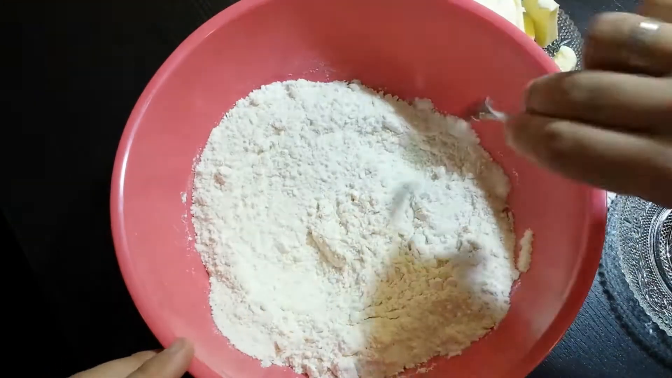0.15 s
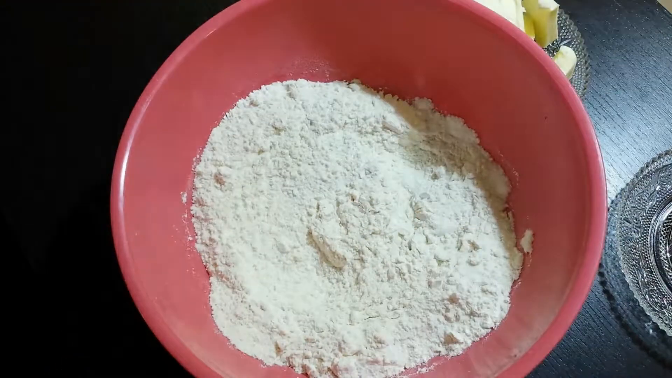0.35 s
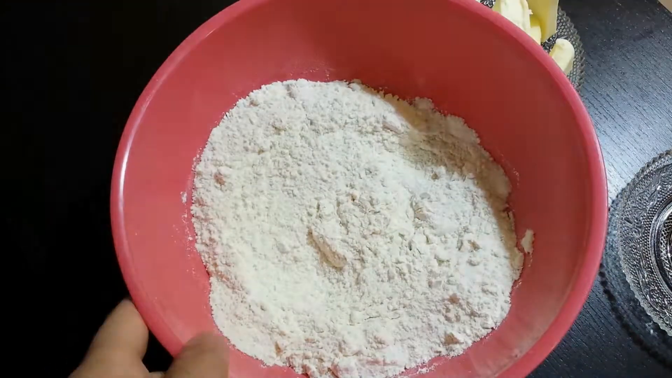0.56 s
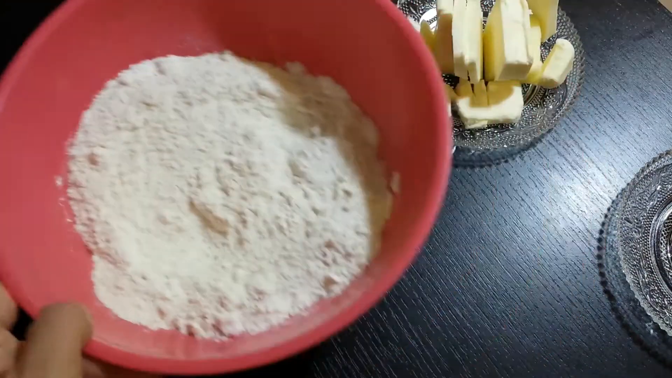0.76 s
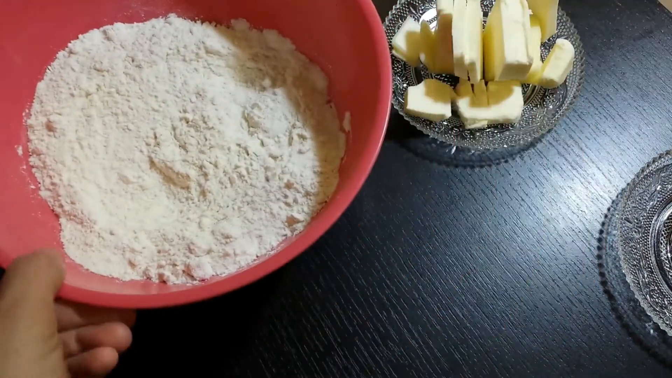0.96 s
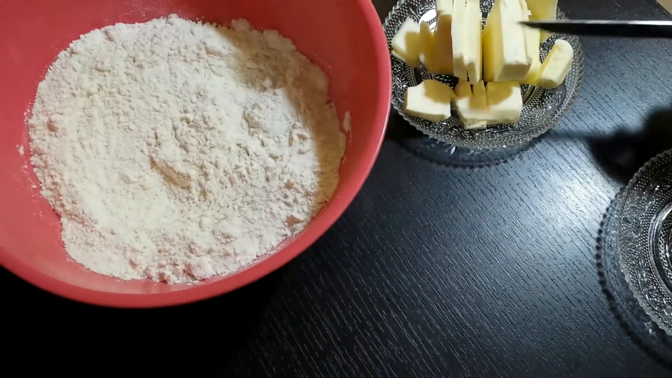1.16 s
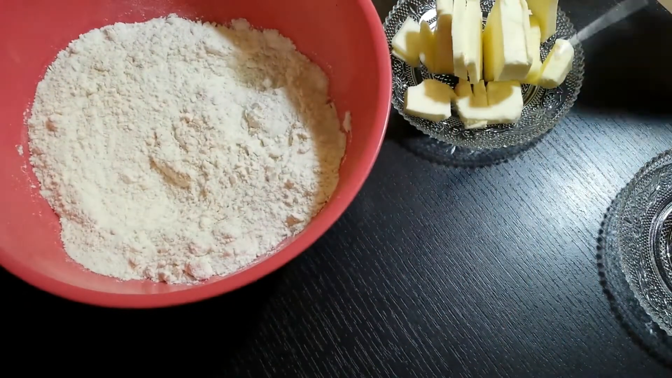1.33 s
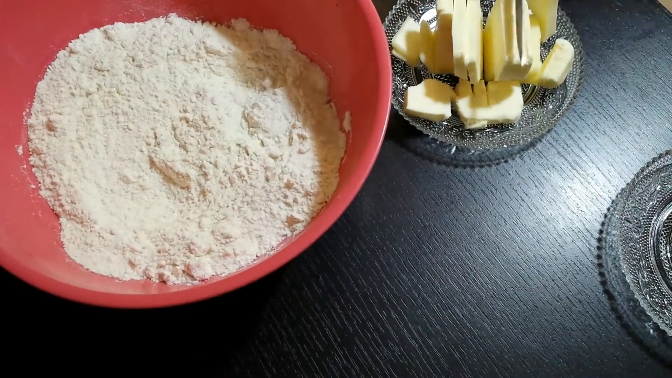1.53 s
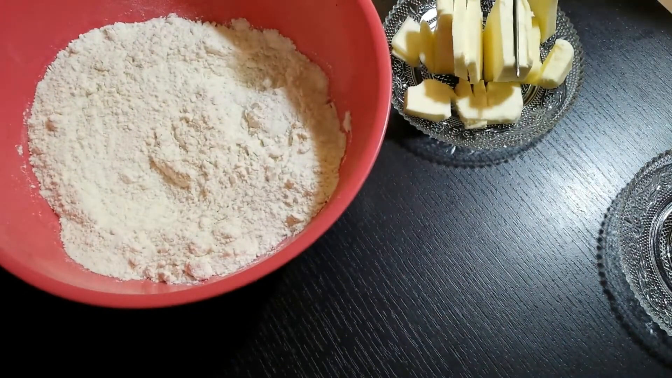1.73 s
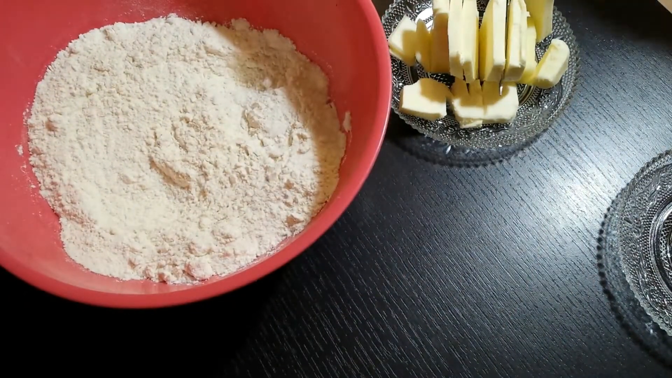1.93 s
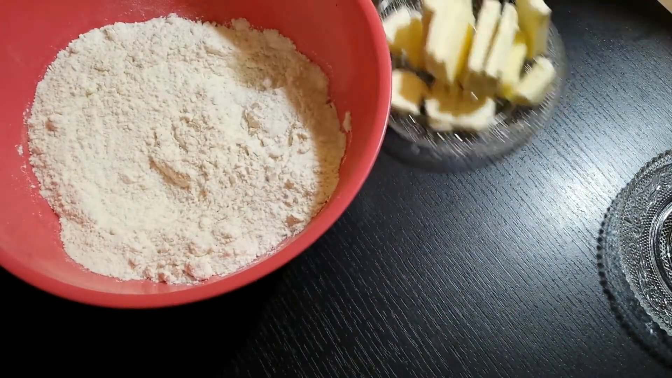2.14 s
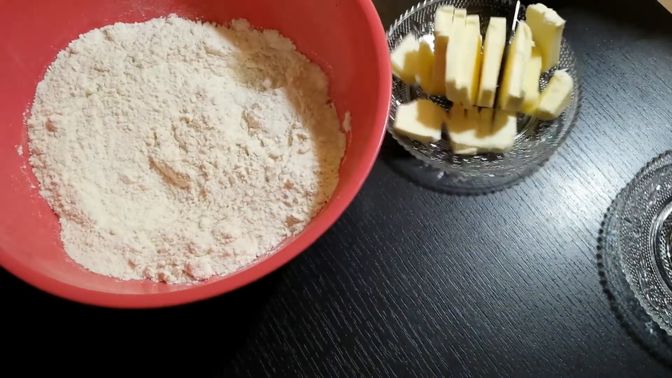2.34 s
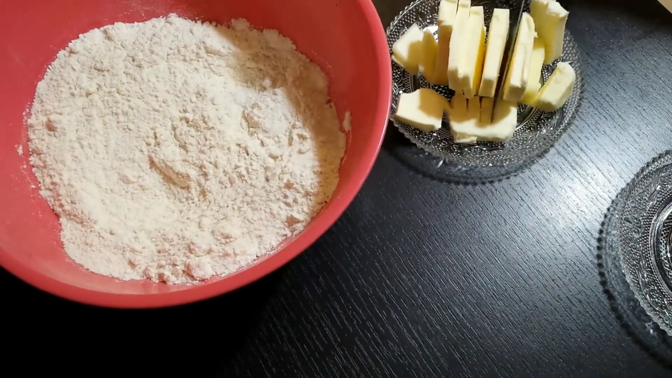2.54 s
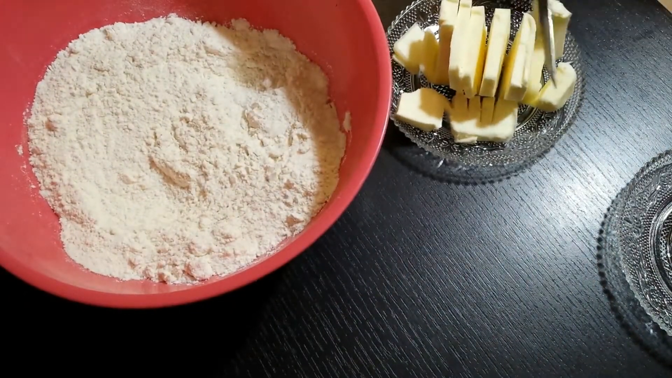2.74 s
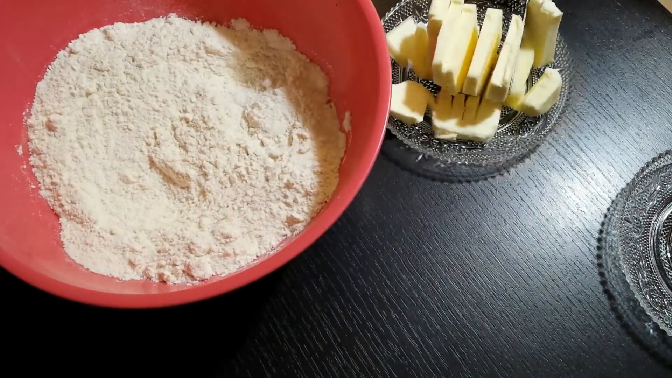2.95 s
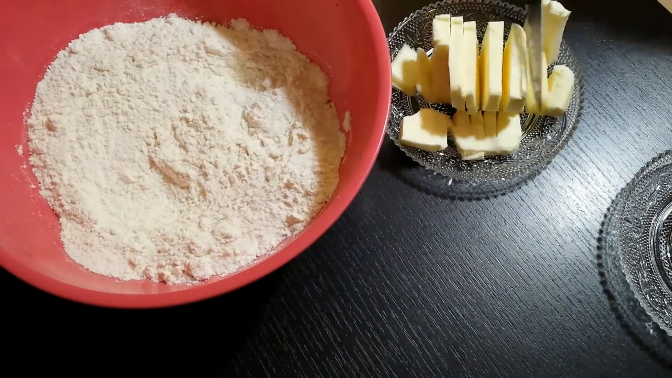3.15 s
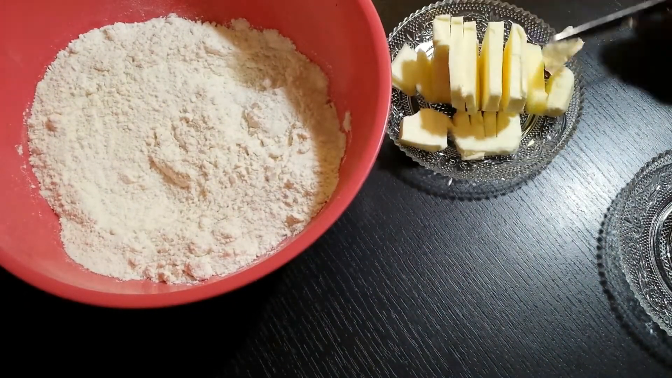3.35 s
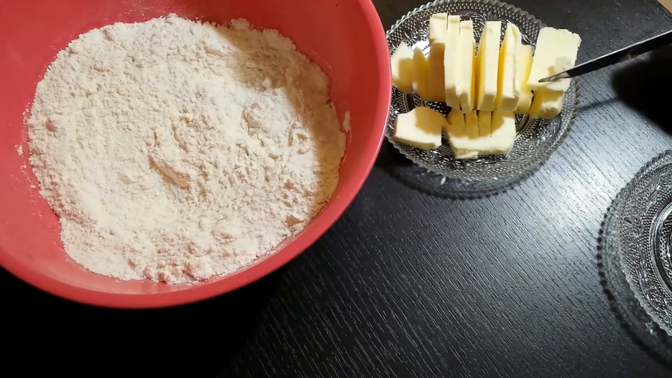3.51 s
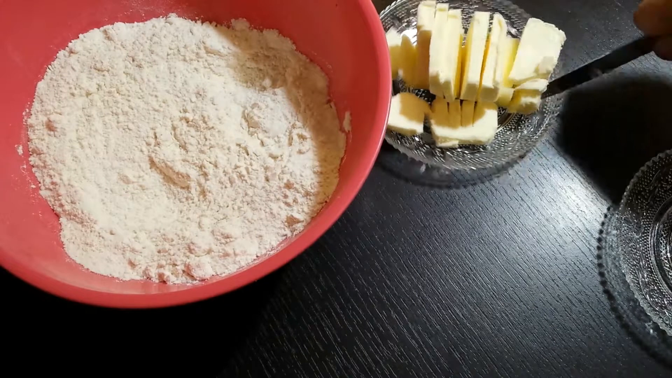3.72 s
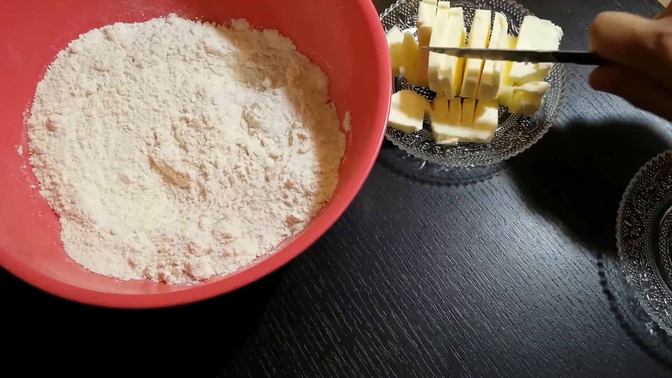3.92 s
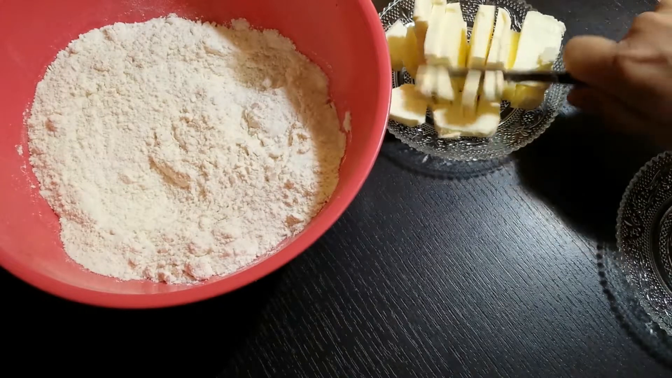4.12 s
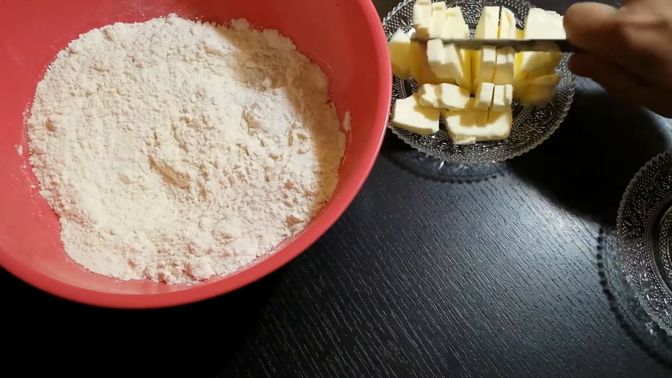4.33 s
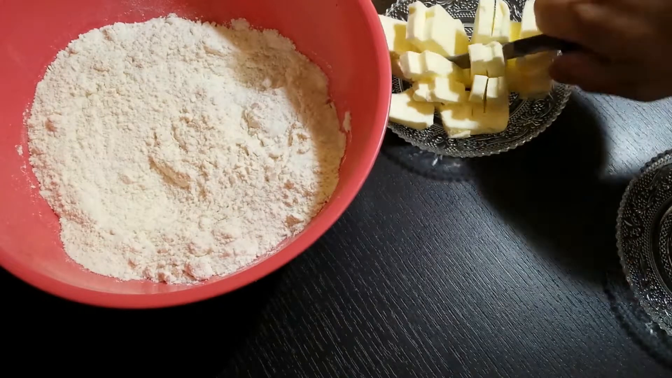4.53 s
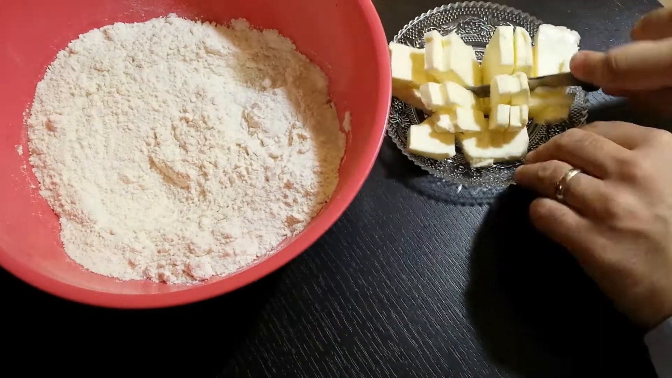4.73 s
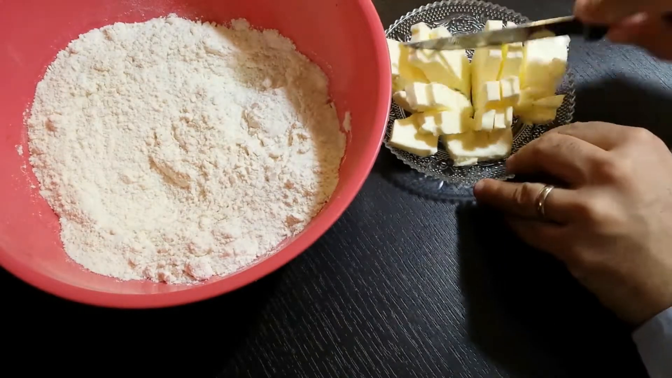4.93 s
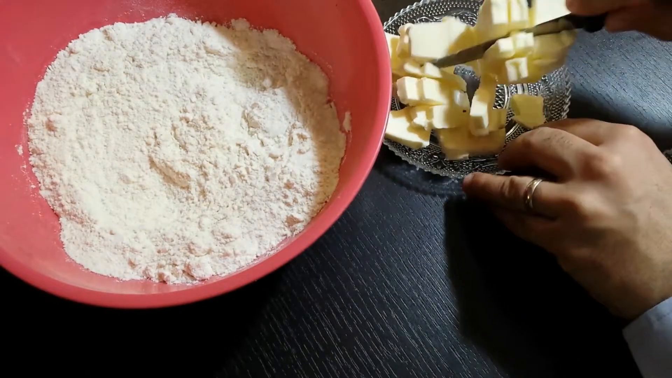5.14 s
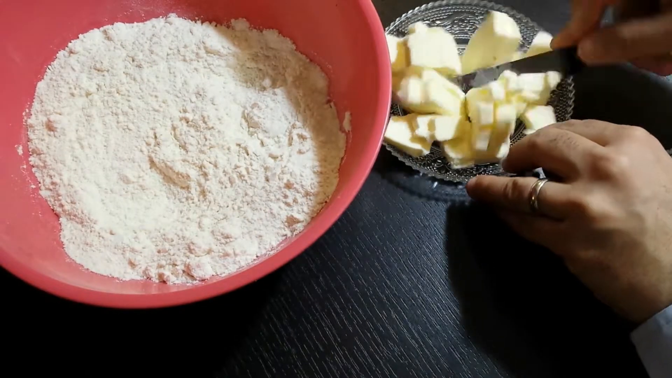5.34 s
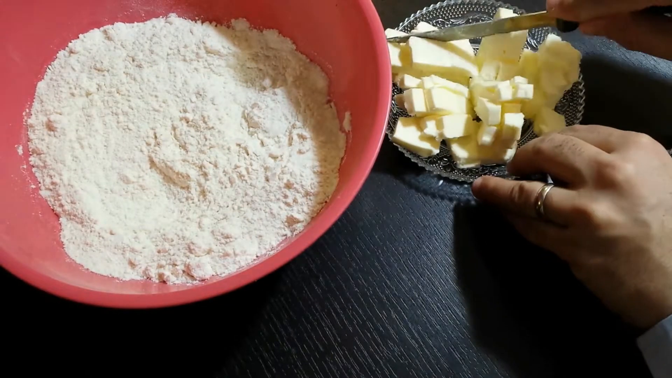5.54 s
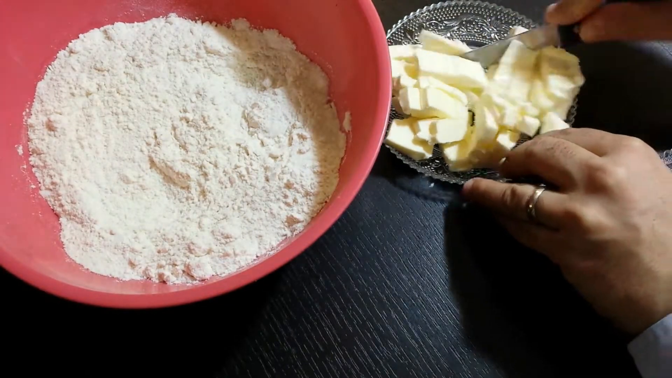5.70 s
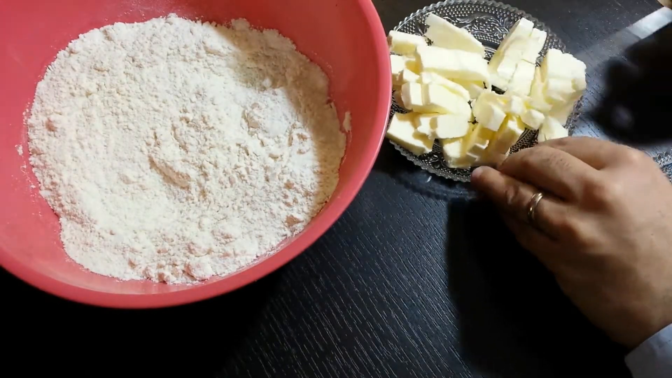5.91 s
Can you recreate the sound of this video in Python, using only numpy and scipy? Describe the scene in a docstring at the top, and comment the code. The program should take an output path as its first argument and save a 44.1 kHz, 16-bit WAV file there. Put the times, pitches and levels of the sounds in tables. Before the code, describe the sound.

In a quiet kitchen, a spoon quickly raps a plastic bowl of flour, then the bowl scrapes briefly along a wooden table. After a near-silent second, a knife cutting butter makes bright clicks on a small glass dish, which knocks and scuffs on the table in irregular bursts. Close stereo microphones, the right one brighter, with faint hum and room tone.

```python
"""A quiet kitchen: a spoon raps a plastic bowl of flour, and the bowl is slid aside on a wooden table.
Then a knife cuts butter in a small glass dish: the blade clicks, the dish knocks and slides.
Impacts are noise bursts that excite decaying modes; friction is uneven noise under stroke envelopes.
A hum and room tone lie beneath; of two close microphones, the right one faces the dish."""
import sys
import numpy as np
from scipy import signal
from scipy.fft import rfft, irfft
from scipy.io import wavfile
from scipy.ndimage import uniform_filter1d

SR = 44100
rng = np.random.default_rng(int(sys.argv[2]) if len(sys.argv) > 2 else 0)


def unload_audio(sound):
    """Save the sound as a 16-bit wav file, at the path given as the first command line argument."""
    columns = np.transpose(np.atleast_2d(sound))
    # keep every value between -1 and 1, then stretch to whole-number steps
    steps = np.round(np.clip(columns, -1, 1) * 32767)
    wavfile.write(sys.argv[1], SR, steps.astype(np.int16))


N = 263277  # samples

# Room tone spectrum: pitch_hz, relative level_db per Hz
AIR_SPECTRUM = [(20, -6), (60, -14), (100, -3), (150, -10.5), (300, -10), (700, -18), (1000, -21),
                (2200, -25.5), (4500, -24), (6800, -20), (9000, -26.5), (15800, -27.5)]
# Room tone, left against right: pitch_hz, left_minus_right_db
AIR_BALANCE = [(60, -6), (240, -6), (950, -2), (3770, -5.5), (15000, -3.5)]
# Appliance hum: pitch_hz, level_db (rms), width_hz
HUM_BANDS = [(99, -78, 6), (190, -86, 5), (492, -77, 4), (688, -80, 5)]
# Spoon on the bowl rim: start_s, level_db, tilt_db per octave, rise_s, contact_t60_s, strongest_ring_hz
SPOON_TAPS = [(0.02, -29.5, -6.5, 0.0027, 0.049, 590), (0.037, -28, -4, 0.0047, 0.022, 570),
              (0.139, -15.5, 1, 0.002, 0.11, 2085), (0.193, -22.5, 1, 0.011, 0.11, 2500),
              (0.235, -22, 2, 0.0068, 0.1, 2310)]
# Burst spectrum of the plastic bowl: pitch_hz, relative level_db per Hz
BOWL_SPECTRUM = [(47, -56.5), (80, -31.5), (330, -12.5), (500, -6.5), (635, -2), (1370, -8.5), (2380, -2.5),
                 (2720, -7.5), (7010, -8.5), (12200, -29.5), (15500, -41.5)]
# Modes of the plastic bowl: pitch_hz, relative level_db, t60_s
BOWL_RINGS = [(581, 2, 0.053), (1070, -5.5, .05), (2050, -18, .07), (2233, 7.5, 0.056), (2350, -6, 0.077),
              (3190, -24, 0.014), (5580, -10.5, .02), (7700, -2.5, 0.031)]
# Reverberation of the kitchen: pitch_hz, t60_s
KITCHEN_DECAY = [(100, 0.28), (500, 0.18), (2000, 0.2), (6000, 0.12), (12000, 0.11)]
# Short scuffs of bowl, dish and blade: peak_s, rise_s, fall_s, rumble_db, hiss_db
SCUFFS = [(0.034, 0.042, 0.053, -41, -30), (1.16, 0.22, 0.21, -76, -55), (1.35, .03, 0.25, -71, -61.5),
          (2.002, 0.031, .15, -50.5, -52), (2.17, 0.18, 0.086, -45, -47), (2.39, 0.21, 0.14, -51.5, -51.5),
          (2.496, 0.049, .14, -55.5, -53), (2.836, 0.076, 0.08, -59, -66), (2.93, 0.26, 0.059, -62, -63.5),
          (3.59, .2, .07, -61.5, -61.5), (3.79, 0.082, 0.087, -37.5, -45), (4.519, 0.05, 0.073, -56, -51.5),
          (4.62, 0.17, .12, -54.5, -43), (4.72, 0.13, 0.056, -55, -62), (4.814, 0.038, 0.059, -55.5, -48),
          (4.873, 0.055, 0.053, -56.5, -53), (5.113, 0.063, .1, -47, -41.5),
          (5.252, 0.037, 0.089, -59, -59), (5.365, .06, 0.098, -54.5, -45.5),
          (5.61, 0.05, 0.0093, -67, -56), (5.689, 0.031, 0.037, -50.5, -47), (5.736, 0.046, 0.08, -54, -52)]
# The bowl's long slide: time_s, level_db (rumble and hiss alike)
BOWL_SLIDE = [(0.58, -76.5), (0.672, -41.5), (0.708, -37.5), (0.85, -45.5), (0.894, -61.5), (0.934, -55),
              (1.0, -71.5), (1.04, -94)]
# Table rumble under friction: pitch_hz, relative level_db per Hz
RUMBLE_SPECTRUM = [(15, -44), (25, -28), (182, -4), (278, -10), (337, -5.5), (425, -8), (636, -8),
                   (1180, -18.5), (2500, -26), (3250, -31.5), (5500, -120)]
# Hiss of the rubbing faces: pitch_hz, relative level_db per Hz
HISS_SPECTRUM = [(880, -5.5), (1500, -9.5), (1820, -6.5), (1990, -6), (2540, -5), (4530, -3), (5670, 0),
                 (6620, 6.5), (8370, -4), (13900, -11), (15500, -14.5)]
# Dry low pops without a tail: start_s, level_db, left_minus_right_db, width_s
LOW_POPS = [(1.453, -44.5, 18.5, 0.0018), (1.894, -48.5, 16, 0.0032), (4.077, -31, 28, 0.00094),
            (4.408, -38.5, 26.5, 0.0012)]
# Dish foot on the table: start_s, level_db, contact_t60_s, strongest_ring_hz
DISH_KNOCKS = [(2.0, -39.5, 0.066, 630), (2.089, -28, 0.048, 575), (2.178, -33.5, 0.039, 626),
               (2.279, -37, 0.044, 330), (2.354, -42, 0.073, 132), (2.384, -40, 0.12, 313),
               (2.488, -41.5, 0.06, 594), (2.707, -57, 0.17, 176), (2.833, -39, 0.033, 380),
               (2.911, -52.5, 0.04, 293), (3.002, -20, 0.059, 841), (3.045, -41.5, 0.042, 244),
               (3.569, -52.5, 0.13, 431), (3.695, -22.5, 0.051, 995), (3.7314, -20.5, 0.11, 334),
               (3.784, -29, 0.018, 627), (4.142, -31, 0.082, 975), (4.202, -21, 0.06, 719),
               (4.258, -40, 0.024, 276), (4.45, -25.5, 0.017, 740), (4.594, -32.5, 0.11, 615),
               (4.622, -34.5, 0.067, 410), (4.788, -44, 0.059, 297), (4.849, -42, 0.091, 930),
               (5.047, -59, 0.033, 480), (5.076, -30, 0.017, 313), (5.114, -26.5, 0.023, 487),
               (5.134, -33, 0.05, 567), (5.237, -53, 0.11, 680), (5.314, -42.5, 0.046, 485),
               (5.357, -36.5, 0.1, 490), (5.408, -45.5, 0.05, 513), (5.64, -27, 0.047, 685),
               (5.722, -40.5, 0.053, 823)]
# Burst spectrum of the wooden table: pitch_hz, relative level_db per Hz
TABLE_SPECTRUM = [(41, -46.5), (70, -24.5), (327, 0), (507, 1.5), (621, 5), (933, -0.5), (1500, -6),
                  (2410, -20.5), (3430, -27.5), (4000, -31), (5200, -47), (8800, -120)]
# Modes of the wooden table: pitch_hz, relative level_db, t60_s
TABLE_RINGS = [(171.8, -13.5, 0.046), (345, -3.5, .07), (675, -2.5, 0.18), (882, 3, 0.041),
               (1130, -21.5, .04)]
# Blade on glass: start_s, level_db, contact_t60_s, blade_ring_hz, low_zone_db, middle_zone_db, high_zone_db
BLADE_CLICKS = [(2.0112, -47, 0.026, 7150, -12, -37, -17), (2.084, -38, 0.059, 6270, -20, -22, -16.5),
                (2.1536, -39.5, 0.017, 6400, -7, -24, -14), (2.1731, -30.5, 0.0073, 6410, -11, -8, -5.5),
                (2.28, -29.5, 0.11, 6580, -22, -12, -12.5), (2.385, -21.5, 0.0064, 6400, -10, -8, -7.5),
                (2.406, -35, 0.02, 6600, -32, -42, -25), (2.834, -46, 0.021, 6220, -18, -32.5, -17.5),
                (2.9946, -9, 0.034, 6770, -19, -19, -12.5), (3.694, -17.5, 0.009, 6640, -63, -6, -14),
                (3.731, -26, 0.025, 5960, 3.5, -37.5, -13), (4.14, -11.5, 0.02, 6480, -48.5, -11.5, -24.5),
                (4.208, -31.5, 0.017, 6400, -2.5, -27.5, -14),
                (4.4507, -20, 0.015, 6850, -17.5, -13.5, -22), (4.79, -42.5, 0.067, 6980, -22, -12, -20),
                (5.0736, -28, 0.042, 7340, -17.5, -20, -19), (5.3141, -35.5, 0.0081, 6440, -27, -15, -20),
                (5.366, -32.5, 0.015, 7200, -37, -31, -31), (5.6394, -25, 0.014, 6310, -18.5, -15, -15.5)]
# Groups of glass modes that each spot of the dish excites more or less: pitch_hz
GLASS_ZONES = [2093, 3100, 4600, 11180]
# Modes of the glass dish: pitch_hz, relative level_db, t60_s
GLASS_RINGS = [(1830, -8, 0.051), (3117, -21, 0.033), (3660, -5, 0.026), (4880, 1.5, 0.011), (5340, 6, .03),
               (7140, -17, 0.039), (7590, -0.5, 0.078), (8330, -18.5, 0.019)]
# Shading of the left microphone: pitch_hz, gain_db
LEFT_SHADING = [(60, -2), (180, -1.5), (550, -5.5), (1650, -3.5), (4970, -16), (15000, -17.5)]

LEAD_S = .04  # time that a blow may take to build up
# Level differences below are left minus right, before the shading of the left microphone
TAP_PAN_DB = -0.5
KNOCK_RISE_S, KNOCK_PAN_DB = 0.0034, 2.1
CLICK_RISE_S, CLICK_PAN_DB = .0025, 1.5
# Knock brightness in dB an octave: grows with strength and with the pitch of the spot
KNOCK_TILT_DB, TILT_PER_DB, TILT_PER_OCTAVE = 0.4, 0.264, 3.3
STROKE_ENDS_DB, STROKE_SHAPE = -25.5, 1.314  # level at both ends; power of the slope toward them
SLIDE_TILT_DB = -0.5  # dB an octave: the heavy bowl rumbles darker
TOP_ZONE_DB = -25.0  # the top glass zone answers every click alike
AIR_DB = -65.5
EDGE_HZ = 15900  # upper band limit


def amp(db):
    """Decibel law: the amplitude ratio of a level in dB."""
    return 10 ** (np.asarray(db) / 20)


def evened(x):
    """Normalization: scales the signal to unit rms."""
    return x / np.sqrt(np.mean(x ** 2) + 1e-20)


def read(points, hz):
    """Logarithmic pitch: interpolates a spectrum table on a log-frequency axis."""
    f, value = np.transpose(points)
    return np.interp(np.log(hz + 1), np.log(f + 1), value)


def add(mix, s, sound):
    """Superposition: sums a two-channel sound into the mix at time s."""
    part = mix[:, round(s * SR):][:, :sound.shape[1]]
    part += sound[:, :part.shape[1]]


def pair(size, same):
    """Partial correlation: two noise channels share a common part."""
    a, b = rng.standard_normal((2, size))
    same = np.clip(same, 0, 1)
    return np.array([same * a + np.sqrt(1 - same ** 2) * b, a])


def coloured(x, points, tilt_db=0., centre_hz=1000.):
    """Linear filtering: weights the spectrum by a table, tilted about a centre in dB an octave."""
    hz = np.fft.rfftfreq(x.shape[-1], 1 / SR)
    gain_db = read(points, hz) + tilt_db * np.log2((hz + 20) / centre_hz)
    return irfft(rfft(x) * amp(gain_db), x.shape[-1])


def sides(pan_db):
    """Interchannel level difference: left and right gains, as a column."""
    return amp([[pan_db / 2], [-pan_db / 2]])


def blow(db, pan_db, tilt_db, rise, t60, colour, modes, centre_hz, ring_db, rattle_db):
    """Modal excitation: a rattling contact force radiates a burst and sets the body's modes ringing."""
    t = np.arange(12000) / SR
    late = t - LEAD_S
    build_up = np.exp(-(late / np.clip(rise, .0008, .012)) ** 2)
    decay = amp(-60 * late / max(t60, .006))
    contact = np.where(late < 0, build_up, decay)
    bounces = uniform_filter1d(rng.standard_normal(len(t)), 150)  # each lasts a few ms
    force = pair(len(t), same=0.45) * contact * amp(rattle_db * evened(bounces))
    force[0] = np.roll(force[0], rng.integers(-60, 60))  # each spot has its own path difference
    burst = coloured(force, colour, tilt_db, centre_hz)

    # each mode is a close cluster of three
    hz, mode_db, ring_t60 = np.repeat(np.transpose(modes), 3, axis=1)[:, :, None]
    spot_db = 2 * rng.standard_normal(hz.shape)  # each spot favours other modes
    mode_db = mode_db + spot_db + tilt_db * np.log2(hz / centre_hz)
    cluster_hz = hz * rng.uniform(1.0, 1.035, hz.shape)
    body = (amp(mode_db - 60 * t / ring_t60) * np.sin(2 * np.pi * cluster_hz * t)).sum(0)
    rung = signal.fftconvolve(force, body[None], axes=1)[:, :len(t)]

    sound = evened(burst) + amp(ring_db) * evened(rung)
    peak_power = uniform_filter1d((sound ** 2).mean(0), 200).max()
    return amp(db) * sides(pan_db) * sound / np.sqrt(peak_power)


def play(s, sounds):
    """Time alignment: places blows so that their peaks follow the onset times."""
    out = np.zeros((2, N + SR))
    for at, sound in zip(s, sounds):
        add(out, at + .003, sound)
    return out[:, round(LEAD_S * SR):][:, :N]


def air():
    """Stationary noise: room tone drifts a little over an appliance hum of narrow fuzzy bands."""
    t = np.arange(N) / SR
    swings = (np.sin(2 * np.pi * (f * t + rng.random())) / np.sqrt(f) for f in np.geomspace(.4, 9, 20))
    drift = evened(sum(swings))
    left, right = evened(coloured(pair(N, same=.1), AIR_SPECTRUM))
    tone = amp(AIR_DB + 0.41 * drift) * np.array([coloured(left, AIR_BALANCE), right])
    for hz, db, width in HUM_BANDS:
        noise = pair(N, same=0.55) + 1j * pair(N, same=0.63)
        waver = signal.lfilter([1], [1, -np.exp(-np.pi * width / SR)], noise)
        envelope = 2 + evened(waver.real) + 1j * evened(waver.imag)
        phase_lead = np.array([[1.5j], [0]])  # radians, left ahead of right
        carrier = np.exp(2j * np.pi * hz * t + phase_lead)
        tone = tone + amp(db) * evened((envelope * carrier).real)
    return tone


def spoon():
    """Impact on a plastic shell: the spoon raps the rim, and the spot sets the strongest ring."""
    blows = []
    for _, db, tilt_db, rise, t60, hz in SPOON_TAPS:
        modes = BOWL_RINGS + [(hz, 13.0, .03)]
        blows.append(blow(db, TAP_PAN_DB, tilt_db, rise, t60, BOWL_SPECTRUM, modes,
                          centre_hz=2000, ring_db=-7.0, rattle_db=2.0))
    return play([r[0] for r in SPOON_TAPS], blows)


def kitchen(x):
    """Reverberation: sparse echoes of random sign, each band dying at its own speed."""
    echoes = np.zeros((2, SR // 2))
    at = np.arange(160, SR // 2 - 20, 20)
    at = at + rng.integers(0, 20, (2, len(at)))
    np.put_along_axis(echoes, at, rng.choice([-1., 1.], at.shape), 1)
    hz, t, z = signal.stft(echoes, SR, nperseg=256)
    decay = amp(-60 * t / read(KITCHEN_DECAY, hz)[:, None])
    tail = signal.istft(z * decay, SR, nperseg=256)[1]
    return signal.fftconvolve(x, tail / np.linalg.norm(tail[0]), axes=1)[:, :N]


def drags():
    """Friction: uneven slips and crumbs make the table rumble and the rubbing faces hiss."""
    t = np.arange(N) / SR
    crumbs = amp(1.33 * np.minimum(rng.exponential(1, N), 4)) * (rng.random(N) < 150. / SR)  # 150 a second
    lumps = 1 + 0.19 * signal.lfilter([1], [1, -.992], crumbs)  # each crumb: a few ms of stronger rubbing
    slips = pair(N, same=0.041) * lumps
    slide = amp(np.interp(t, *np.transpose(BOWL_SLIDE), left=-200, right=-200))
    low, high = np.zeros(N), slide
    for s, rise, fall, low_db, high_db in SCUFFS:
        distance = np.maximum((s - t) / rise, (t - s) / fall)  # 0 at the peak, 1 at either end
        stroke = amp(STROKE_ENDS_DB * distance ** STROKE_SHAPE)
        low = low + amp(low_db) * stroke
        high = high + amp(high_db) * stroke
    scuff_rumble = low * evened(coloured(slips, RUMBLE_SPECTRUM))
    slide_rumble = slide * evened(coloured(slips, RUMBLE_SPECTRUM, SLIDE_TILT_DB))
    hiss = high * evened(coloured(slips, HISS_SPECTRUM)) * sides(6.4)
    return scuff_rumble + slide_rumble + hiss


def pops():
    """Pressure pulse: one low swing with a little grit on it, close to the left microphone."""
    out = np.zeros((2, N))
    for s, db, pan_db, width in LOW_POPS:
        u = (np.arange(900) / SR - .008) / width
        swing = (u ** 2 - 1) * np.exp(-u ** 2 / 2)
        rough = evened(signal.lfilter([1], [1, -.95], pair(900, same=0.29)))
        grit = 0.5 * np.exp(-u ** 2 / 8.2) * rough
        add(out, s - .005, amp(db - 8.5) * sides(pan_db) * (swing + grit))
    return out


def dish():
    """Impact on a wooden plate: the rocking dish thumps the table, and the spot sets the strongest ring."""
    blows = []
    for _, db, t60, hz in DISH_KNOCKS:
        tilt_db = KNOCK_TILT_DB + TILT_PER_DB * (db + 37.5) + TILT_PER_OCTAVE * np.log2(hz / 600)
        modes = TABLE_RINGS + [(hz, 13.0, .03)]
        blows.append(blow(db, KNOCK_PAN_DB, tilt_db, KNOCK_RISE_S, t60, TABLE_SPECTRUM, modes,
                          centre_hz=600, ring_db=-4.5, rattle_db=6.0))
    return play([r[0] for r in DISH_KNOCKS], blows)


def knife():
    """Coupled resonators: the blade strikes the glass, and the grip shifts the blade's own ring."""
    blows = []
    for _, db, t60, hz, *lower_db in BLADE_CLICKS:
        zone_db = lower_db + [TOP_ZONE_DB]
        floor = [(900, -27.5), (6900, -7.5), (15500, TOP_ZONE_DB - 16.5)]
        zones = [(f * edge, level) for f, level in zip(GLASS_ZONES, zone_db) for edge in (.91, 1.09)]
        colour = sorted(floor + zones)
        rings = GLASS_RINGS + [(hz, 1.5, .04)]
        modes = [(f, level + read(colour, f), ring_t60) for f, level, ring_t60 in rings]
        blows.append(blow(db, CLICK_PAN_DB, 0, CLICK_RISE_S, t60, colour, modes,
                          centre_hz=5000, ring_db=-6.0, rattle_db=3.5))
    return play([r[0] for r in BLADE_CLICKS], blows)


def scene():
    """Superposition: impacts, echoes and friction, shaded toward the left microphone, plus pops and air."""
    hits = spoon() + knife() + dish()
    left, right = hits + amp(-8.0) * kitchen(hits) + drags()
    return np.array([coloured(left, LEFT_SHADING), right]) + pops() + air()


def record(dry):
    """Compression: loud hits lower the gain, which then recovers; a low-pass sets the band limit."""
    power_db = 10 * np.log10(abs(uniform_filter1d((dry ** 2).mean(0), 400)) + 1e-12)
    fall = np.arange(N) * 59.7 / SR  # the held level falls by 59.7 dB a second
    held_db = np.maximum.accumulate(power_db + fall) - fall
    over_db = np.maximum(held_db + 41.5, 0)  # excess over a threshold of -41.5 dB
    ducked = dry / amp(0.16 * uniform_filter1d(over_db, 200))
    low_pass = signal.firwin(511, EDGE_HZ, window=("kaiser", 9), fs=SR)
    return signal.oaconvolve(ducked, low_pass[None], "same")


dry = scene()
out = record(dry)
unload_audio(out)
```